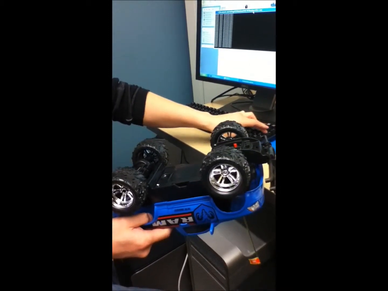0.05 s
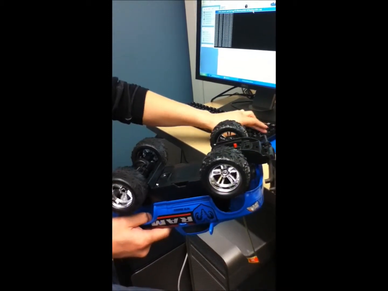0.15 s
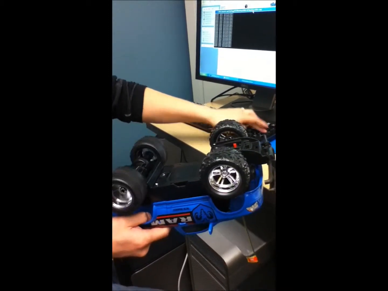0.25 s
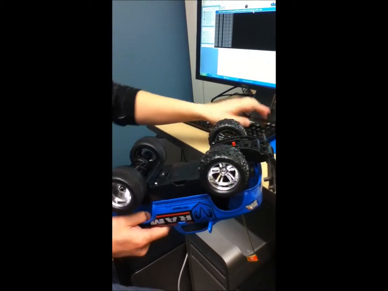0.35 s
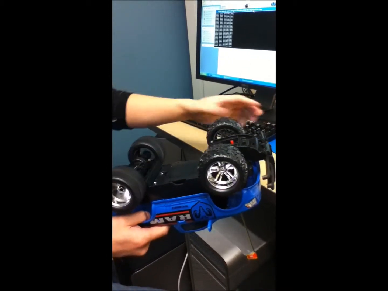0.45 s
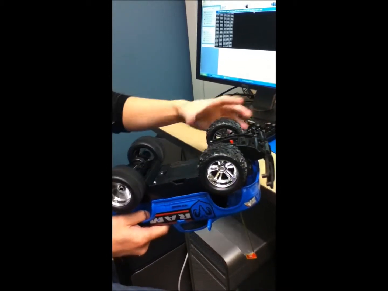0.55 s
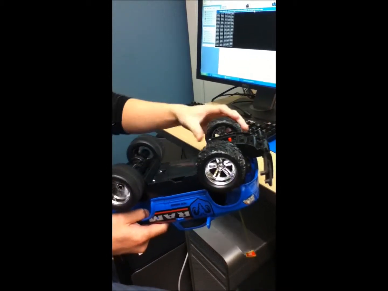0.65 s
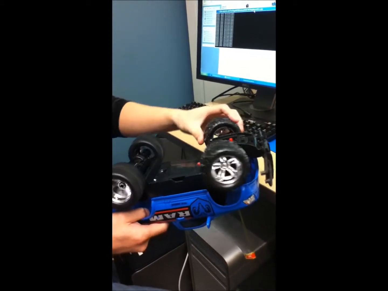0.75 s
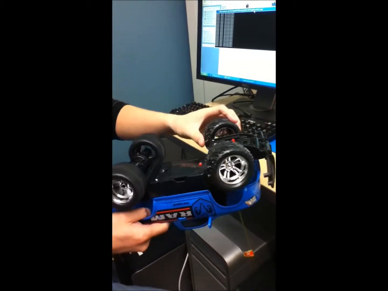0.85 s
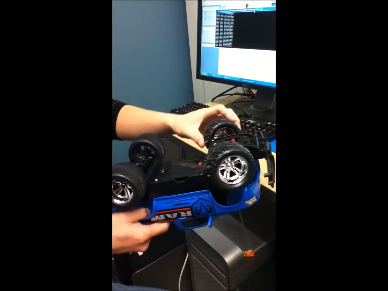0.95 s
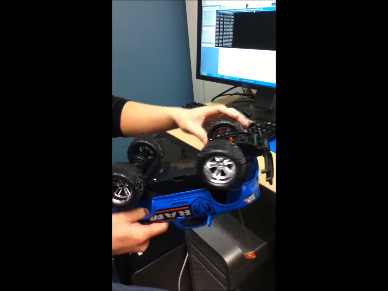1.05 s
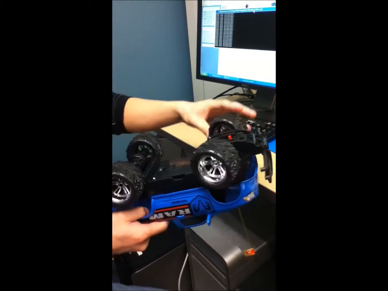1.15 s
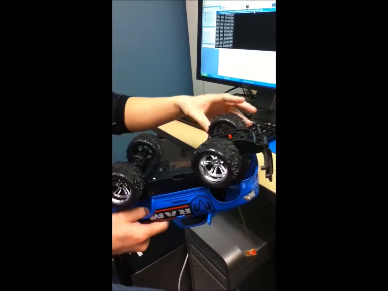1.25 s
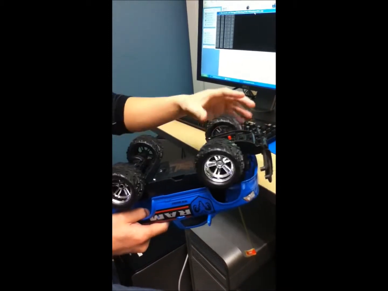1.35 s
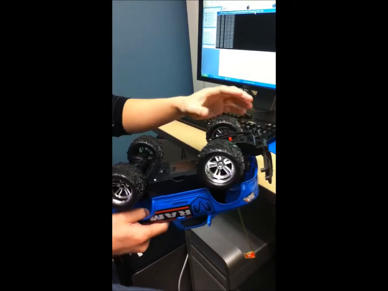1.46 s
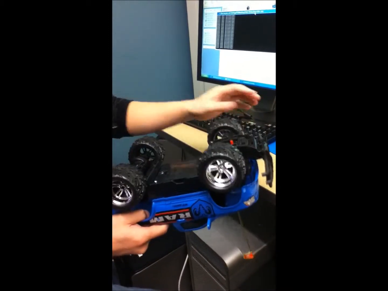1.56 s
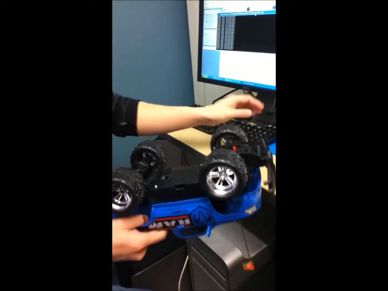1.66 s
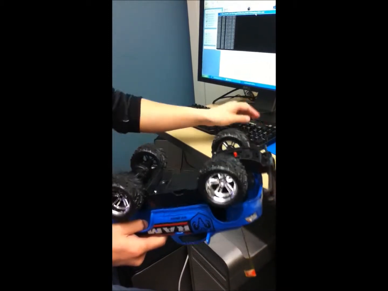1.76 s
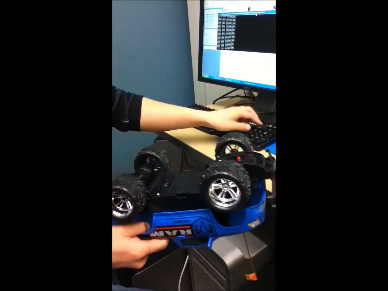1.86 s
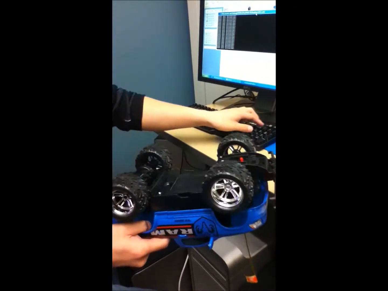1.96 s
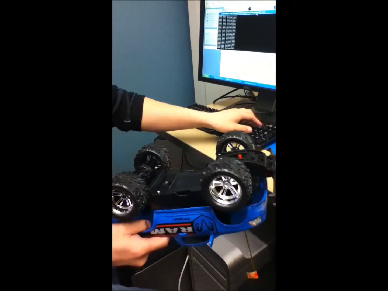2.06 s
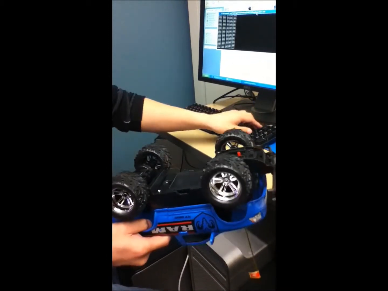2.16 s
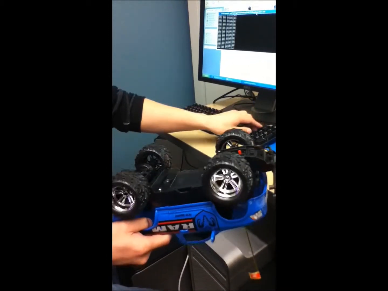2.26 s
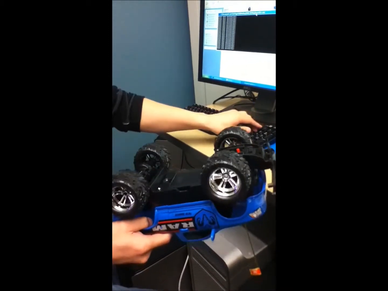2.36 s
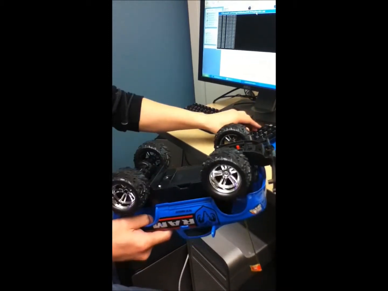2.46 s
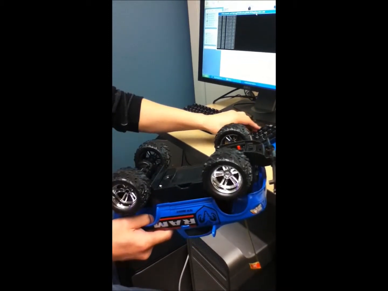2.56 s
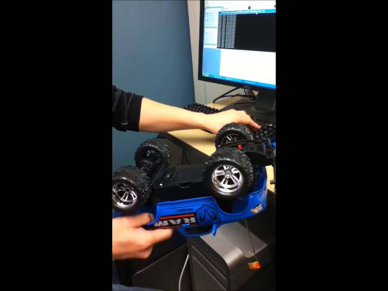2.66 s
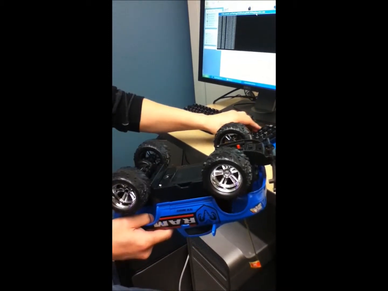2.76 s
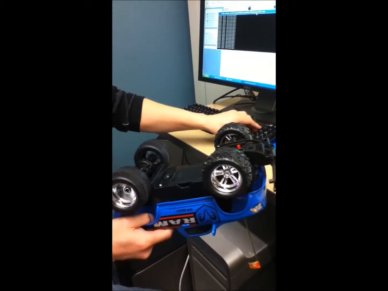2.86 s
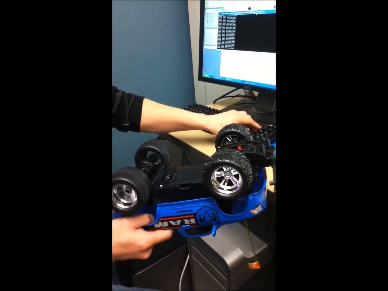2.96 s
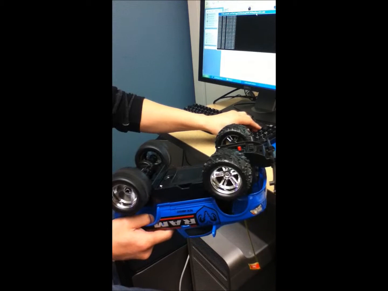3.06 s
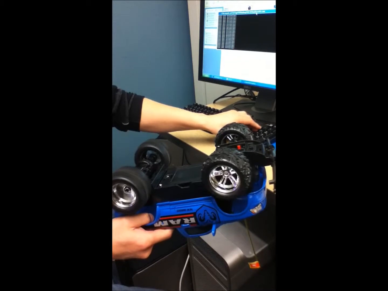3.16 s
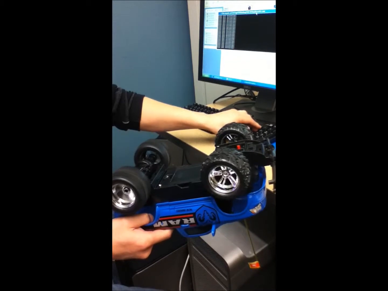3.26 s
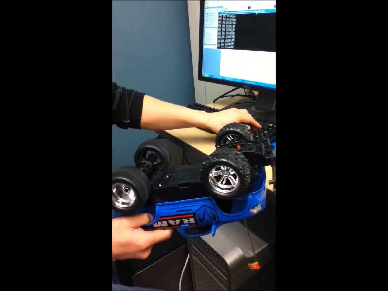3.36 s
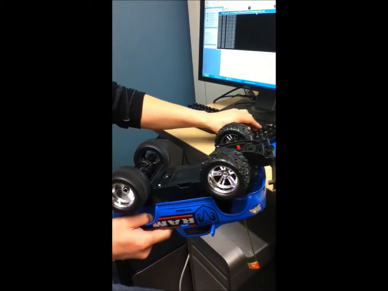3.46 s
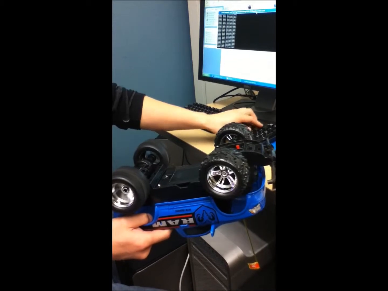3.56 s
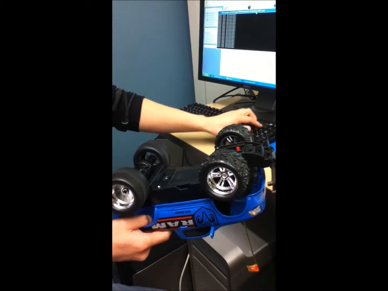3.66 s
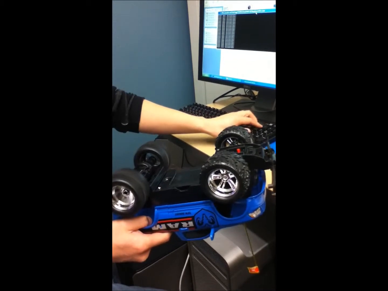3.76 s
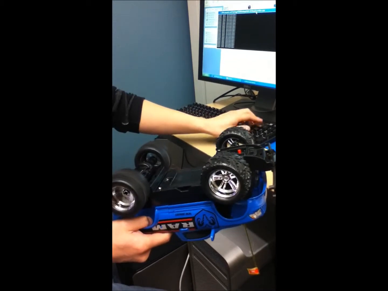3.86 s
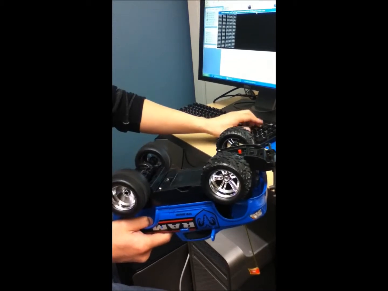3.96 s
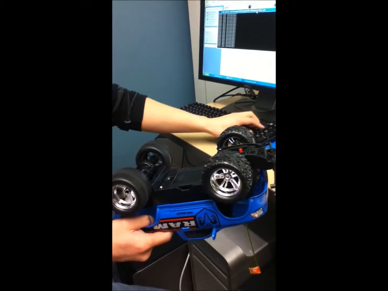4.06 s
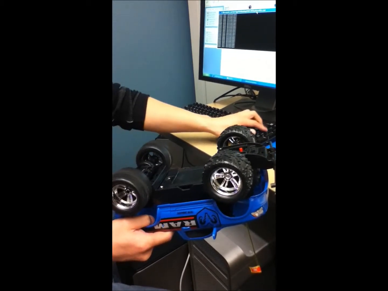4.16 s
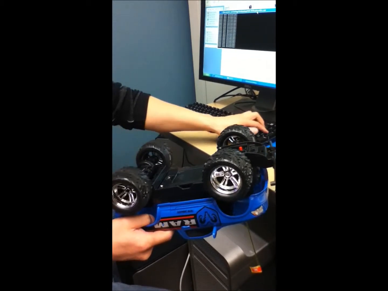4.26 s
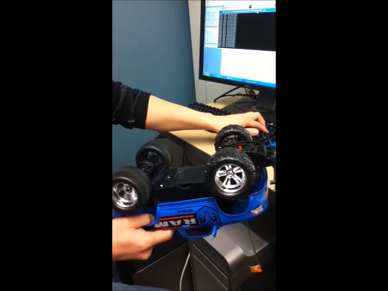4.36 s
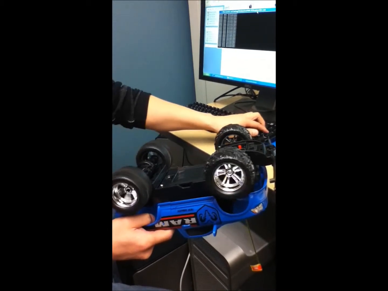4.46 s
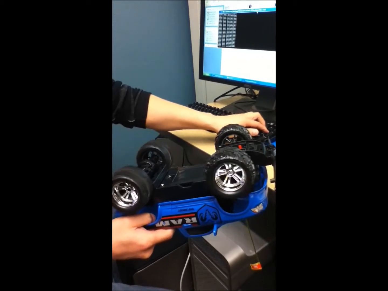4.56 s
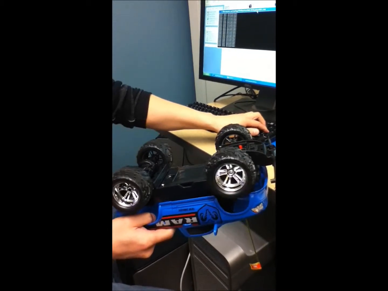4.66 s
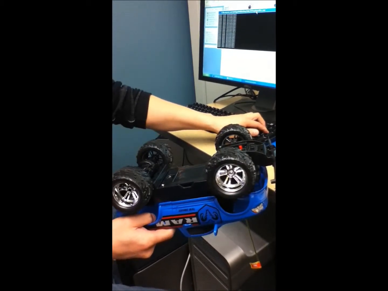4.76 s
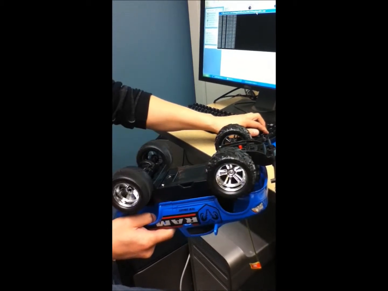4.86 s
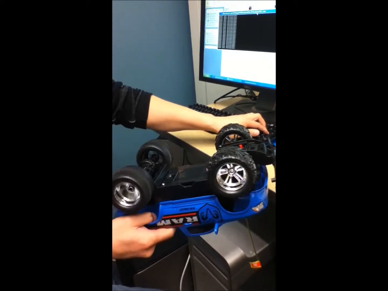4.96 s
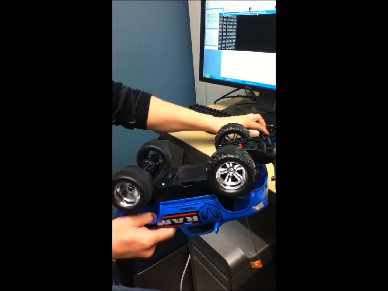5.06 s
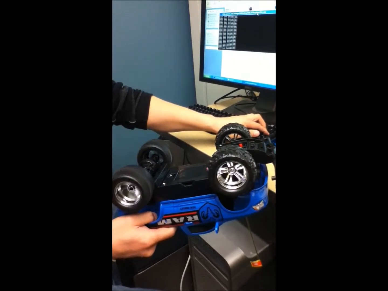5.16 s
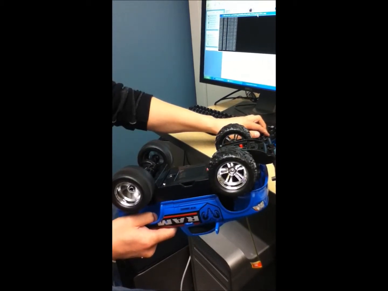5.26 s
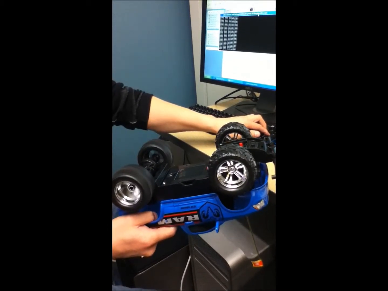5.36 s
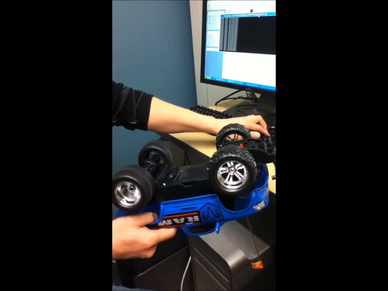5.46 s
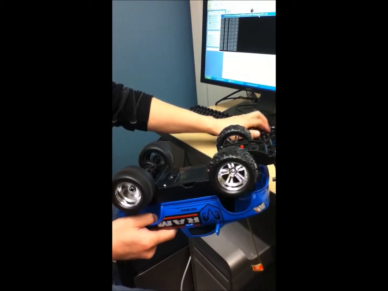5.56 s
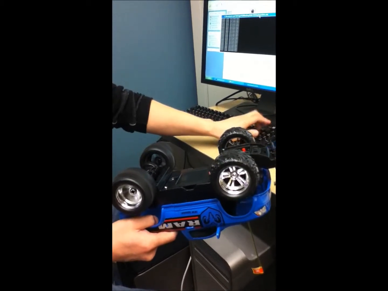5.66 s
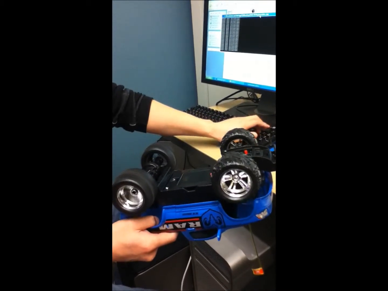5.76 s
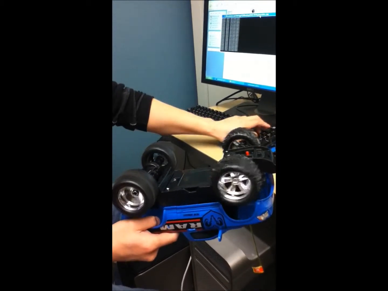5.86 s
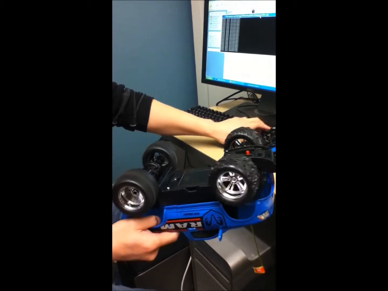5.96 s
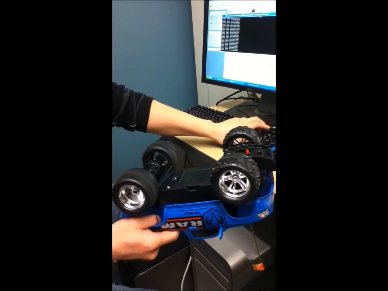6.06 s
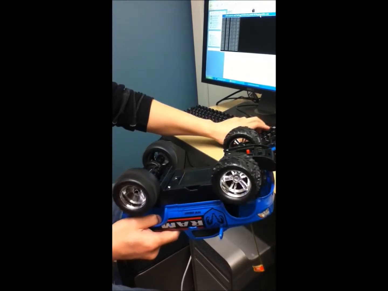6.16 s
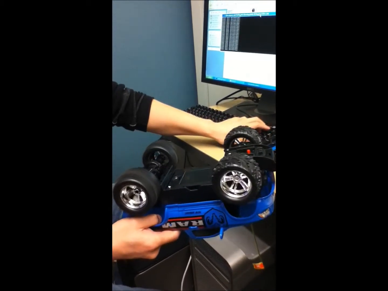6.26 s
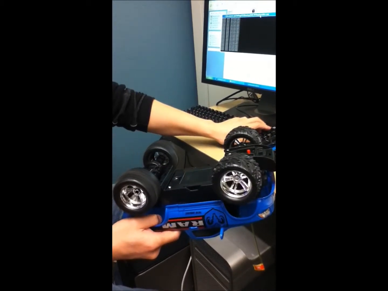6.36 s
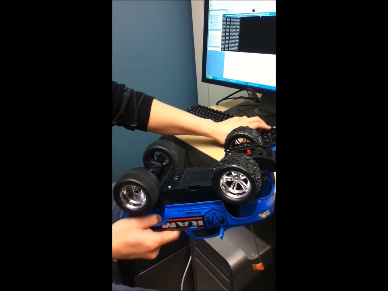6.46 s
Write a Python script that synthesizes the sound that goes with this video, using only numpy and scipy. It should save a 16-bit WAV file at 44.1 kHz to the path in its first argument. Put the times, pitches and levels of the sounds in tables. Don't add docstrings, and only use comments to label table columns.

```python
import sys
import numpy as np
from scipy import signal
from scipy.fft import rfft, irfft
from scipy.io import wavfile
from scipy.ndimage import uniform_filter1d

SR = 44100
rng = np.random.default_rng(int(sys.argv[2]) if len(sys.argv) > 2 else 0)


def wav_record(signal):
    frames = np.transpose(np.atleast_2d(signal))
    bounded = np.clip(frames, -1, 1)
    quanta = np.round(bounded * 32767).astype(np.int16)
    wavfile.write(sys.argv[1], SR, quanta)


def attenuation_scalar(level_db):
    decades = np.asarray(level_db, float) / 20
    return 10 ** decades


N = 286650
TOP_HZ = 440


def level(x, db):
    return x * attenuation_scalar(db) / np.sqrt(np.mean(x ** 2))


def walk(rate):
    hold = int(SR / rate)
    steps = np.repeat(rng.standard_normal(N // hold + 1), hold)
    return 1.226 * uniform_filter1d(uniform_filter1d(steps, hold), hold)[:N]


def response(points, size=4096):
    hz, db = np.transpose(points)
    grid = np.maximum(np.arange(size // 2 + 1) * SR / size, 1)
    cepstrum = irfft(np.log(attenuation_scalar(np.interp(np.log(grid), np.log(hz), db))))
    cepstrum[1:size // 2] *= 2
    cepstrum[size // 2 + 1:] = 0
    return irfft(np.exp(rfft(cepstrum)))


def blow(t, at, t60, rise_s=0.00017):
    i = slice(int(at * SR), int((at + .15) * SR))
    age = t[i] - t[i][0]
    return i, (1 - np.exp(-age / rise_s)) * 1000 ** (-age / max(t60, .004))


def drive(t):
    # (on [s], off [s], coasting [s], level against the usual burst [dB])
    bursts = [
        (0.242, 0.582, 0.51, 0),
        (1.13, 1.249, 0.033, -38.5),
        (2.358, 2.39, .09, -13),
        (2.856, 3.796, 0.51, -0.5),
        (4.376, 4.471, .23, -12),
        (4.932, 5.833, 0.65, 0),
        (6.455, 6.9, 0.44, 0.5),
    ]
    # (time after power on [s], steady rattle [dB], shaft speed [turns/s], hum [dB],
    # gear whine against the rattle [dB])
    spin_up = [(.012, -72, 270, -82, -20.5), (0.021, -31, 272, -80, -18), (.045, -23, 276, -82, -8.5),
               (0.076, -16.5, 280, -78, -12), (0.118, -15.5, 292, -69, -11.5),
               (0.188, -17, 336, -69.5, -16), (.27, -25.5, 373, -70, -7.5), (.38, -27, 415, -52.5, -14),
               (.88, -24.5, 440, -45, -11)]
    # (share of the coasting time [1], steady rattle against its powered level [dB])
    run_down = [(0, 1.5), (.15, 3), (.6, -2.5), (.8, -8.5), (.92, -23), (1., -26), (1.12, -35), (1.4, -38)]
    sag_hz_per_s, hum_fade_db_per_s, whine_fade_db_per_s = 420, 188, 53
    bursts = np.array(bursts)
    latest = np.maximum(np.searchsorted(bursts[:, 0], t) - 1, 0)
    on, off, coast, burst_db = bursts[latest].T
    age, *columns = np.transpose(spin_up)
    powered_s = np.minimum(t, off) - on
    load_db, hz, hum_db, whine_db = (np.interp(powered_s, age, c) for c in columns)
    idle = np.maximum(t - off, 0)
    fall_db = burst_db + np.interp(idle / coast, *np.transpose(run_down))
    hz = np.maximum(hz - sag_hz_per_s * idle, 200)
    hum_db = hum_db - hum_fade_db_per_s * idle
    whine_db = np.maximum(whine_db - whine_fade_db_per_s * idle, -19)
    return load_db, fall_db, hz, hum_db, whine_db, idle


def teeth():
    ticks_per_s, scatter_db, rub_db = 4000, 1.8, -2.0
    when, size, rub = rng.random(N), rng.exponential(size=N), rng.standard_normal(N)
    ticks = (when < ticks_per_s / SR) * attenuation_scalar(scatter_db * size) * np.sign(rub)
    rubbing = level(rng.standard_normal(N), rub_db)
    return level(level(ticks, 0) + rubbing, 0)


def binds(idle):
    # (time [s], turns so far [1])
    rotation = [
        [(.346, 0), (.391, 1), (.595, 7), (.635, 8), (.662, 9), (.852, 13), (.913, 14), (.986, 15), (1.123, 17)],
        [(3.018, 0), (3.062, 1), (3.197, 5), (3.484, 15), (3.565, 17), (3.616, 18), (3.681, 20), (3.779, 24)],
        [(3.829, 0), (3.881, 1), (3.918, 2), (3.996, 4), (4.094, 6), (4.192, 8), (4.306, 11)],
        [(5.029, 0), (5.073, 1), (5.11, 2), (5.308, 8), (5.616, 19), (5.828, 27), (5.878, 28)],
        [(5.952, 0), (6.008, 1), (6.261, 6), (6.335, 7)],
    ]
    grip_db = [
        [-11, -8.5, -12.5, -15, -14.5, -22, -22.5, -26.5, -42],
        [-10, -10, -15, -13.5, -14.5, -14.5, -14.5, -12],
        [-23, -16.5, -16, -20, -23.5, -27.5, -40.5],
        [-11.5, -11.5, -8.5, -12.5, -14.5, -13.5, -15],
        [-14.5, -17.5, -22.5, -29],
    ]
    # (time [s],
    # level [dB], half length [ms])
    odd_binds = [(.313, -27, 2), (.615, -20, 7.2), (.779, -28, 3.6), (.852, -17.5, 3.2), (1.018, -25, 3.6),
                 (1.093, -32, 3), (2.483, -47, 6.9), (2.89, -37, 2.6), (2.984, -8.5, 6.3),
                 (3.399, -18.5, 4.9), (3.484, -13, 3.7), (3.563, -13, 3.8), (3.598, -15, 2.5),
                 (3.83, -11, 2.6), (4.183, -22.5, 2.7), (4.445, -17, 16.6), (4.477, -13.5, 1.3),
                 (4.526, -37, 9.3), (4.548, -21.5, 3.3), (4.607, -46, 15), (4.656, -31, 1.9),
                 (4.723, -44, 4.9), (4.772, -40.5, 15.4), (5.509, -24, 3.1), (5.647, -15.5, 2.3),
                 (5.922, -7.5, 2.7), (5.806, -15.5, 4.3), (6.365, -26, 3.9), (6.397, -28.5, 2.8),
                 (6.437, -36, 3.6)]
    driven_share, coast_share = 0.19, 0.26
    level_scatter_db, length_scatter_db = 1.0, 1.2
    rows = [np.array(odd_binds)]
    for points, db in zip(rotation, grip_db):
        s, turns = np.transpose(points)
        at = np.interp(np.arange(turns[-1] + 1), turns, s)
        chance = rng.standard_normal((len(at), 2)).T
        share = np.where(idle[(at * SR).astype(int)] > 0, coast_share, driven_share)
        half_ms = 1000 * share * np.gradient(at) * attenuation_scalar(length_scatter_db * chance[0])
        bind_db = np.interp(at, s, db) + level_scatter_db * chance[1]
        rows.append(np.c_[at, bind_db, half_ms])
    return np.vstack(rows)


def effort(t, load_db, fall_db, hz, idle, boom_db=-16.5, steep=1.49):
    powered_db, coasting_db = (-2.5, -4.5), (2.5, -1)
    colour_scatter_db = 2.0
    rise_share, lead_ms = 0.72, 1.5
    steady_db = load_db + fall_db
    boom = -11.0 - 0.8 * np.maximum(load_db + 24.5, 0) - 0.41 * fall_db
    fizz = -2.5 - 21 * (1 - hz / TOP_HZ) + 2.4 * np.minimum(idle / 0.25, 1)
    power = attenuation_scalar(np.array([steady_db + boom, steady_db - 3.5, steady_db - 5.0, steady_db + fizz])) ** 2
    rows = binds(idle)
    for (at, db, half_ms), chance in zip(rows, rng.standard_normal((len(rows), 2))):
        i = slice(max(int((at - .05) * SR), 0), int((at + 0.045) * SR))
        now = int(at * SR)
        late_ms = (t[i] - at) * 1000 + lead_ms
        side = np.where(late_ms < 0, rise_share, 2 - rise_share)
        swell = np.exp(-steep * (late_ms / side / max(half_ms, .5)) ** 2)
        colour_db = coasting_db if idle[now] > 0 else powered_db
        lower_db, fizz_db = colour_db + colour_scatter_db * chance
        dull_db = 0.42 * min(db + 21, 0)
        share = attenuation_scalar(np.array([lower_db, 0, fizz_db + dull_db])) ** 2
        boom_share = attenuation_scalar(boom_db - 15 * (1 - hz[now] / TOP_HZ)) ** 2
        share = np.r_[boom_share, share / share.sum()]
        power[:, i] += attenuation_scalar(db) ** 2 * share[:, None] * swell
    return np.sqrt(power)


def knocks(t, crest_db=-3.5, boom_db=-5.0, t60=0.038):
    # (time [s], peak [dB], low part [dB], fizz [dB])
    impacts = [(0.2413, -9.5, -16, -23), (2.3605, -7, -9.5, -13), (2.3794, -22.5, -1, -6.5),
               (2.397, -15.5, -9, -15), (2.4147, -20.5, -3.5, -11), (2.687, -35, -7, -15),
               (2.8577, -7, -13.5, -16.5), (3.428, -9, -11, -14), (4.3769, -12.5, -8.5, -11.5),
               (4.3961, -2, -11, -17), (4.9309, -12, -12, -21), (6.454, -4, -12.5, -17.5)]
    out = np.zeros((4, N))
    for at, db, low, fizz in impacts:
        i, shape = blow(t, at, t60, rise_s=.002)
        colour_db = np.array([low + boom_db, low + 6, -3, fizz + 6])
        out[:, i] += attenuation_scalar(db + crest_db + colour_db)[:, None] * shape
    return out


def sizzle(fizz, level_db=-10.0, full_db=-32.0, growth=0.14):
    return attenuation_scalar(level_db) * fizz * (fizz / attenuation_scalar(full_db)) ** growth


def shell(grit, strength, load_db, lo_hz, hi_hz, press=0.25):
    # (frequency [Hz], width [Hz], level [dB])
    modes = [(786, 26, -8), (1207, 63, -4), (1780, 40, 0.5), (1889, 93, 6.5), (2250, 134, 9.5),
             (2323, 58, 1.5), (2898, 290, 6.5), (3310, 140, 1.5), (3778, 140, 6.5), (4290, 300, 3),
             (5710, 93, -27.5), (6160, 200, 1.5), (7630, 150, -6), (9410, 480, -10)]
    # (frequency [Hz], level per Hz [dB])
    plastic = [(300, -31.5), (520, -23.5), (700, -14), (1500, -10), (1700, -2.5), (3500, -0.5), (5000, 0.5),
               (8000, -8), (12000, -11.5), (14000, -22), (16000, -25)]
    patchy_db = 3.5
    edge = signal.butter(N=6, Wn=[lo_hz, hi_hz], btype="band", fs=SR, output="sos")
    tap, dull = signal.unit_impulse(4096), response(plastic)
    out = signal.fftconvolve(np.roll(grit, rng.integers(N)) * strength, dull)[:N]
    unit = np.sum(signal.sosfilt(edge, dull) ** 2)
    for hz, width, db in modes:
        if not lo_hz <= hz < hi_hz:
            continue
        b, a = signal.iirpeak(hz, hz / width, fs=SR)
        strikes = np.roll(grit, rng.integers(N))
        push = strikes * strength * attenuation_scalar(patchy_db * walk(50) + press * load_db)
        out = out + attenuation_scalar(db) * signal.lfilter(b, a, push)
        unit = unit + attenuation_scalar(db) ** 2 * np.sum(signal.lfilter(b, a, tap) ** 2)
    return signal.sosfilt(edge, out) / np.sqrt(unit)


def motor(ring, hz, hum_db, whine_db, stall_db=-45):
    # (multiple of the shaft speed [1], level [dB])
    whine_orders = [
        (2, -17.5),
        (3, -11.5),
        (6, 3),
    ]
    wobble, slack, rough_db = .005, .03, 4.0
    turn = 2 * np.pi * np.cumsum(hz * (1 + wobble * walk(30))) / SR
    turning = ring / (ring + attenuation_scalar(stall_db))
    hum = attenuation_scalar(hum_db + 2.5 * walk(25)) * np.sin(turn) * turning
    mesh = 2 * np.pi * np.cumsum(hz * (1 + slack * walk(120))) / SR
    whine = sum(attenuation_scalar(db + rough_db * walk(60)) * np.sin(k * mesh) for k, db in whine_orders)
    return np.sqrt(2) * (hum + attenuation_scalar(whine_db) * ring * whine)


def fingers(t, crest_db=-1.0, middle_db=-19.0, air_db=-6.5):
    # (time [s], peak [dB], thud [dB], snap [dB])
    releases = [(1.1467, -24, -11, -9), (1.1568, -25, -18, -11), (1.1804, -37, -7, -20),
                (1.1885, -29.5, -8.5, -14), (1.2039, -16, -19, -7.5), (1.2055, -23, -11.5, -8),
                (1.2223, -20, -18, -21), (1.249, -34, -6, -5), (1.3274, -40.5, -7, -20),
                (1.3824, -27.5, -10, -22), (1.395, -27.5, -13, -8.5), (1.4236, -33.5, -10, -8),
                (1.4334, -40, -8, -23), (1.453, -34, -13, -21)]
    # (frequency [Hz], width [Hz], t60 [s])
    tyre_bands = [
        (1570, 2260, 0.044),
        (4330, 2200, 0.024),
        (7340, 1700, 0.0097),
        (9800, 3700, 0.016),
    ]
    out = 0
    for k, (hz, width, t60) in enumerate(tyre_bands):
        strength = np.zeros(N)
        for at, db, thud, snap in releases:
            i, shape = blow(t, at, t60)
            band_db = [thud + 5, middle_db, snap + 5, snap + air_db][k]
            strength[i] += attenuation_scalar(db + crest_db + band_db) * shape
        b, a = signal.iirpeak(hz, hz / width, fs=SR)
        once = signal.lfilter(b, a, strength * rng.standard_normal(N))
        out = out + signal.lfilter(b, a, once) * np.sqrt(SR / width / 2)
    return out


def room(x, t60=.22, wet_db=-19.0, first_s=.003, dull_hz=5000):
    age = np.arange(int(.5 * SR)) / SR
    tail = rng.standard_normal(len(age)) * 1000 ** (-age / t60) * (age > first_s)
    tail = signal.sosfilt(signal.butter(N=1, Wn=dull_hz, fs=SR, output="sos"), tail)
    return x + signal.fftconvolve(x, attenuation_scalar(wet_db) * tail / np.linalg.norm(tail))[:N]


def office():
    # (frequency [Hz], level per Hz [dB])
    air_colour = [(12, -38.5), (20, 4), (38, -6), (55, -15), (113, -9.5), (150, -23.5), (204, -17),
                  (328, -23), (410, -23), (499, -31), (590, -36), (3840, -42.5), (5080, -43),
                  (16000, -50.5)]
    noise = rng.standard_normal(N + 8192)
    air = signal.fftconvolve(noise, response(air_colour, size=8192))[8192:N + 8192]
    return level(air, -39)


def scene():
    edges_hz = [450, 1620, 3300, 5500, 10000, 16500]
    unload_db_per_s = 80
    t = np.arange(N) / SR
    load_db, fall_db, hz, hum_db, whine_db, idle = drive(t)
    gears = effort(t, load_db, fall_db, hz, idle)
    grit = teeth()
    strengths = np.hypot(gears, knocks(t))
    strengths = [*strengths, sizzle(strengths[-1])]
    ranges = zip(strengths, edges_hz, edges_hz[1:])
    truck = sum(shell(grit, s, whine_db + 13, lo, hi) for s, lo, hi in ranges)
    whirr = motor(gears[1], hz, hum_db, whine_db - unload_db_per_s * idle)
    near = truck + whirr + fingers(t)
    return (room(near) + office())[None]


def band_limit(x):
    return signal.sosfilt(signal.butter(12, 16260, fs=SR, output="sos"), x)


def record(dry):
    ceiling, knee = .86, 8
    top = signal.ellip(N=8, rp=.2, rs=70, Wn=16000, fs=SR, output="sos")
    soft = dry / (1 + np.abs(dry / ceiling) ** knee) ** (1 / knee)
    return band_limit(signal.sosfilt(top, soft))


dry = scene()
out = record(dry)
wav_record(out)
```